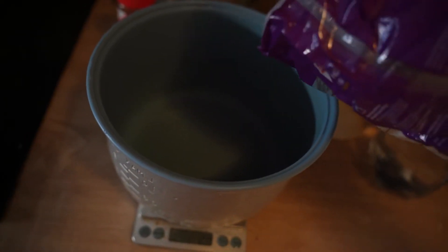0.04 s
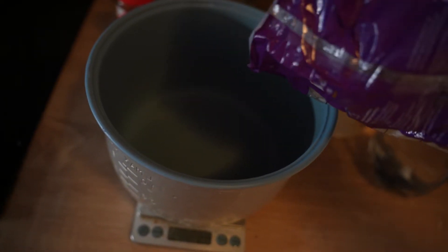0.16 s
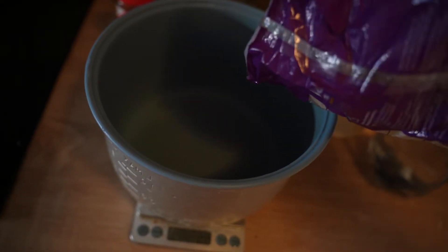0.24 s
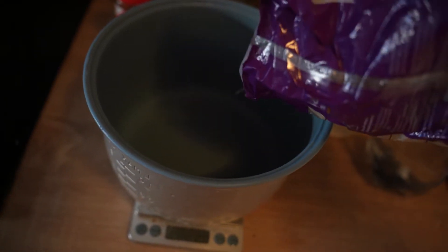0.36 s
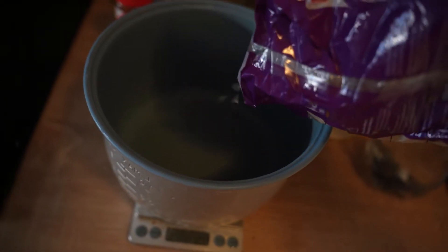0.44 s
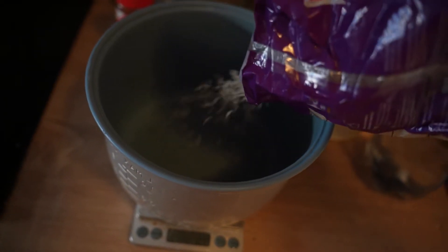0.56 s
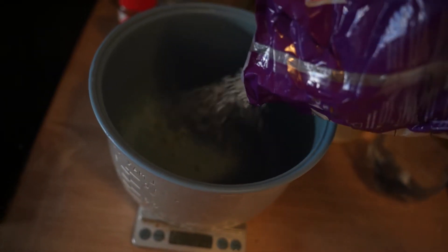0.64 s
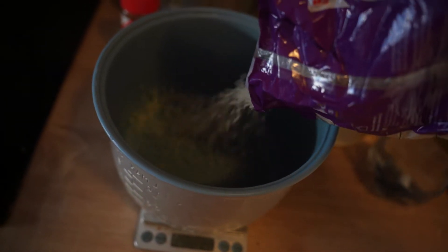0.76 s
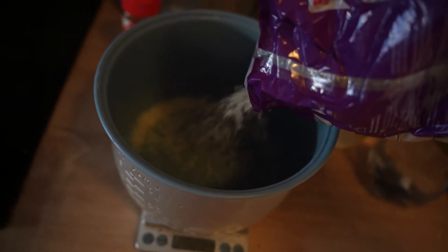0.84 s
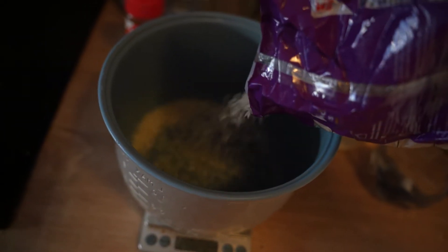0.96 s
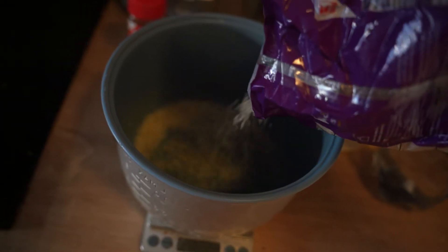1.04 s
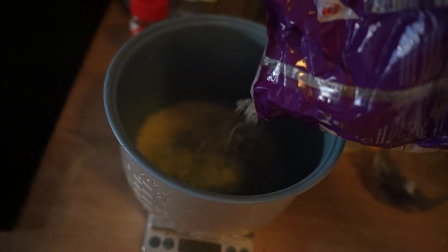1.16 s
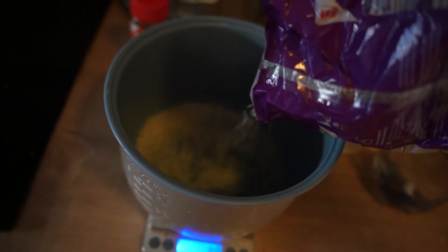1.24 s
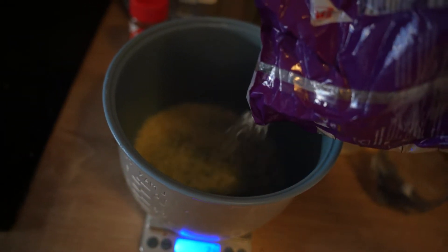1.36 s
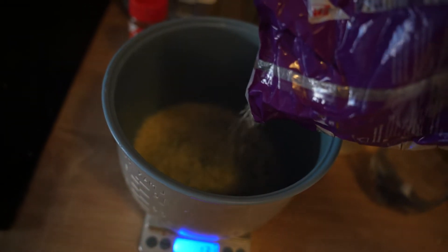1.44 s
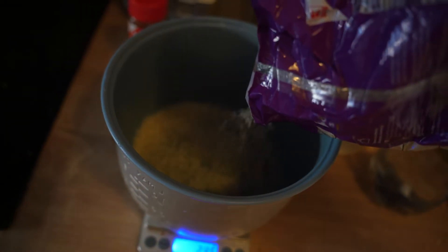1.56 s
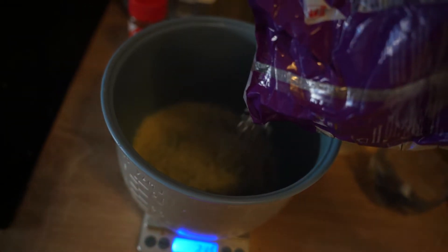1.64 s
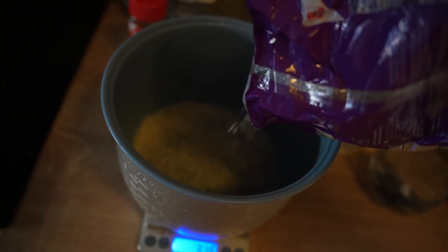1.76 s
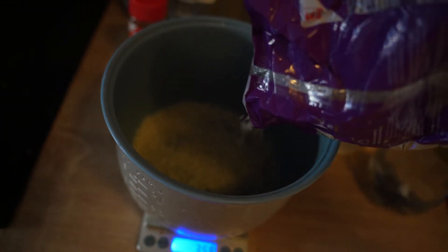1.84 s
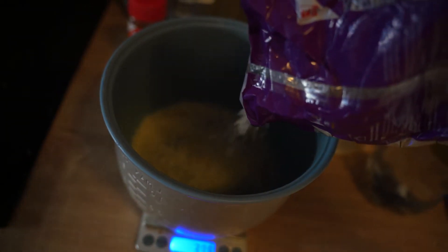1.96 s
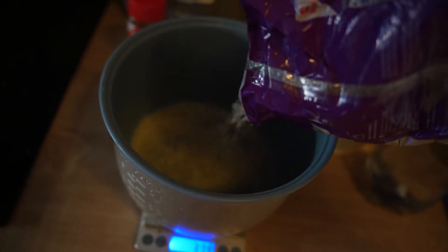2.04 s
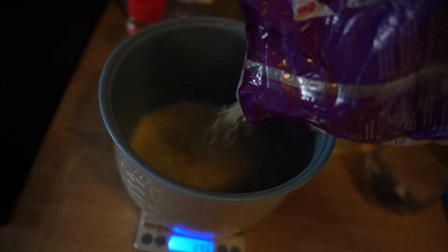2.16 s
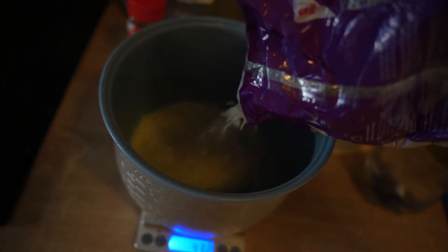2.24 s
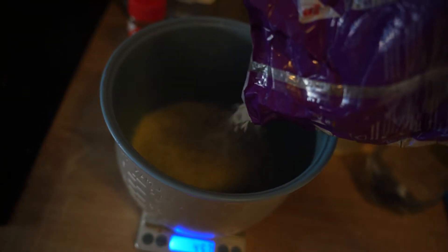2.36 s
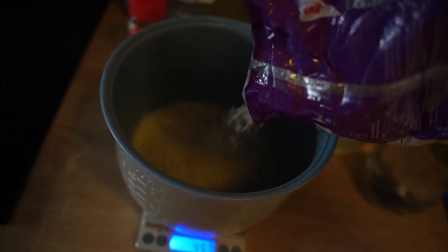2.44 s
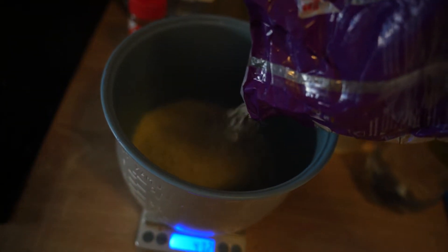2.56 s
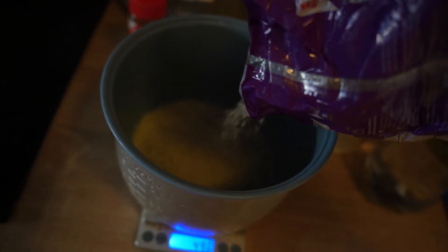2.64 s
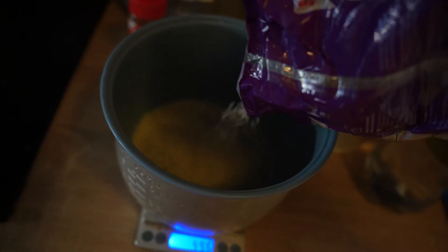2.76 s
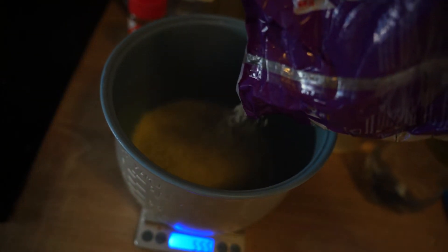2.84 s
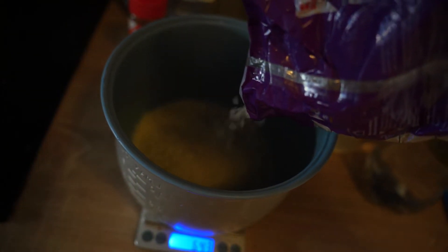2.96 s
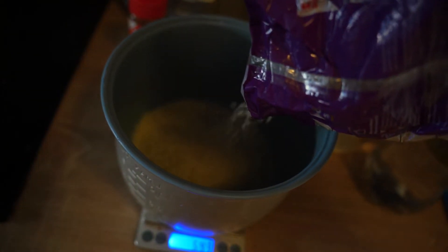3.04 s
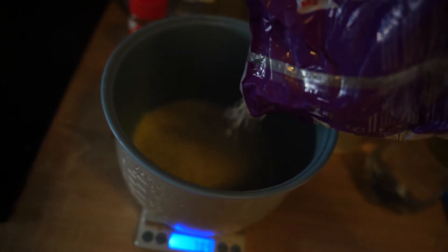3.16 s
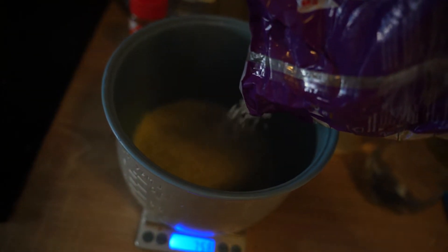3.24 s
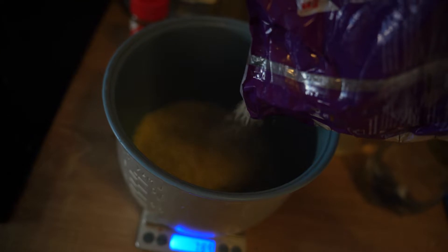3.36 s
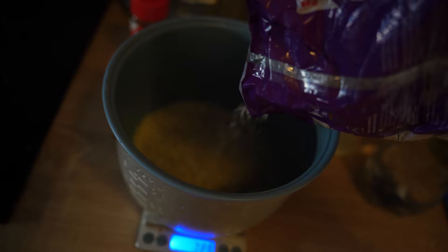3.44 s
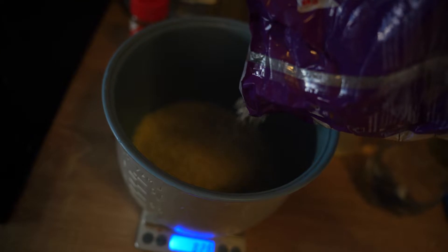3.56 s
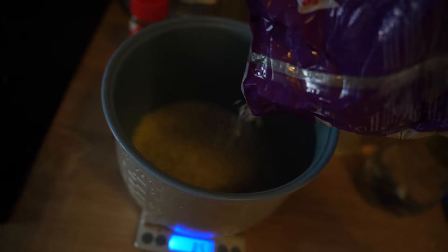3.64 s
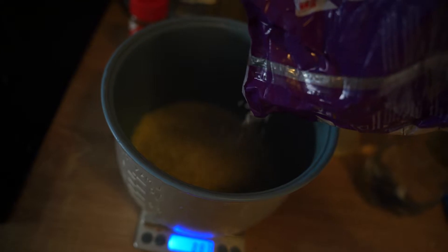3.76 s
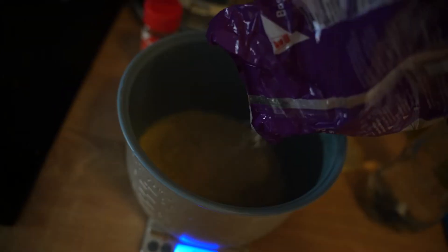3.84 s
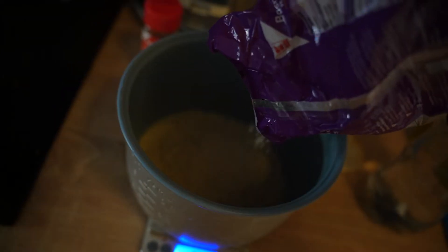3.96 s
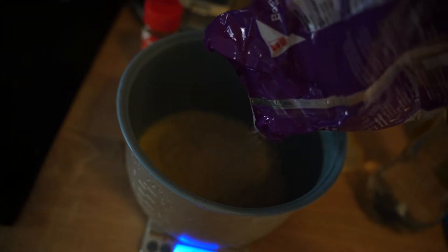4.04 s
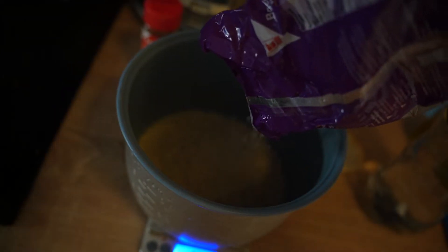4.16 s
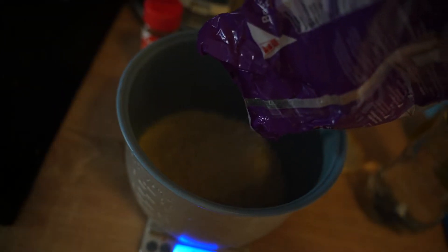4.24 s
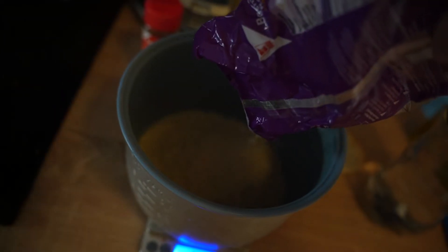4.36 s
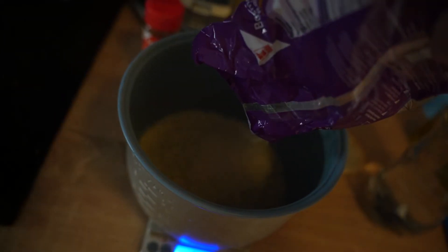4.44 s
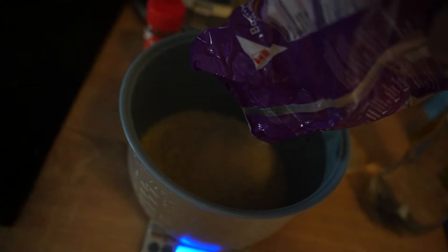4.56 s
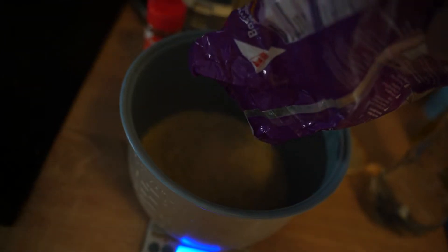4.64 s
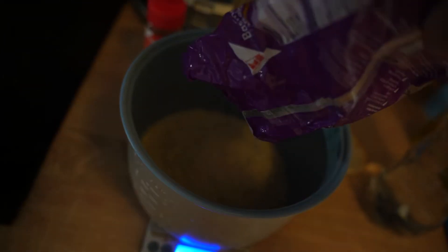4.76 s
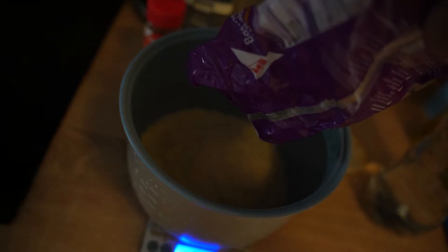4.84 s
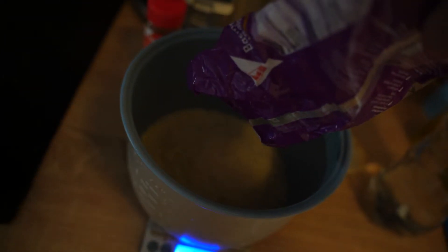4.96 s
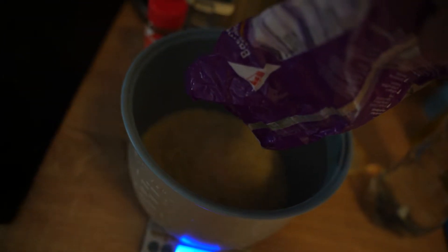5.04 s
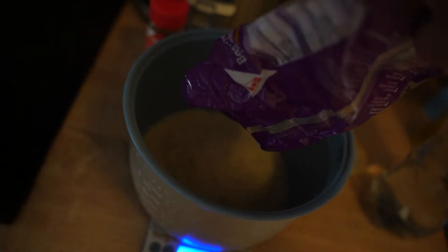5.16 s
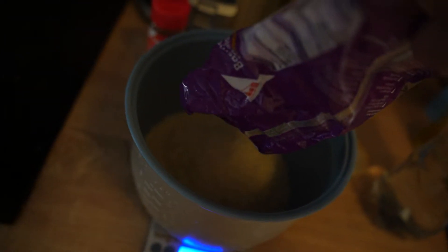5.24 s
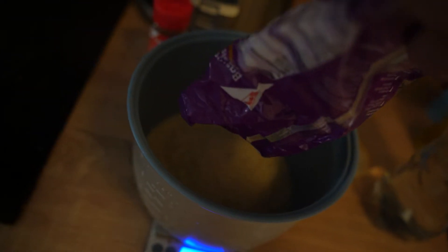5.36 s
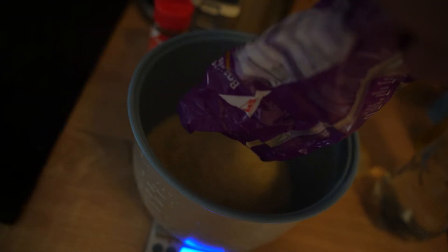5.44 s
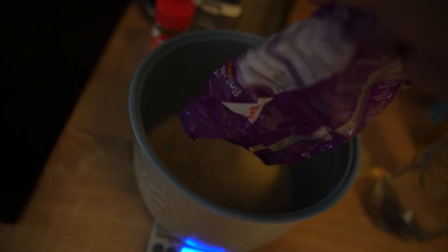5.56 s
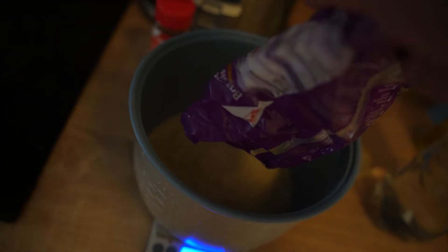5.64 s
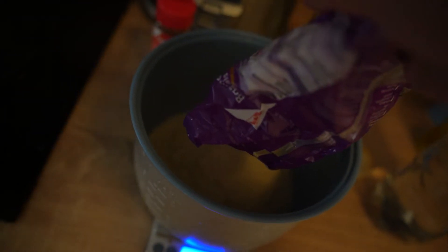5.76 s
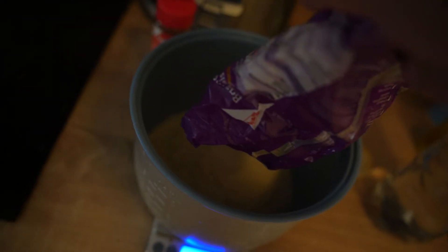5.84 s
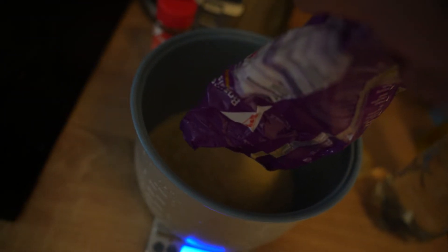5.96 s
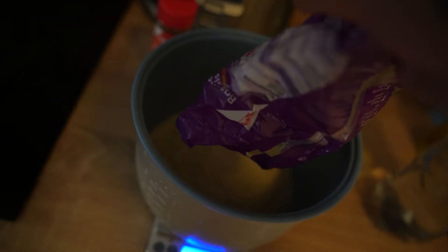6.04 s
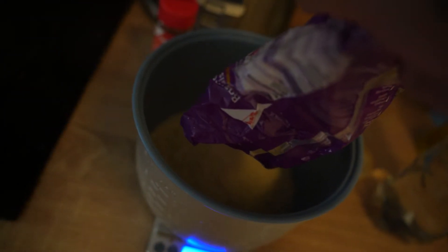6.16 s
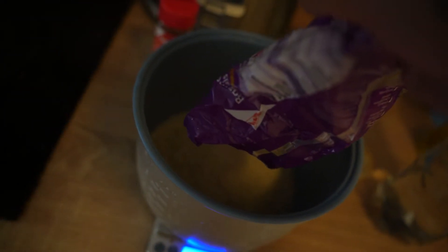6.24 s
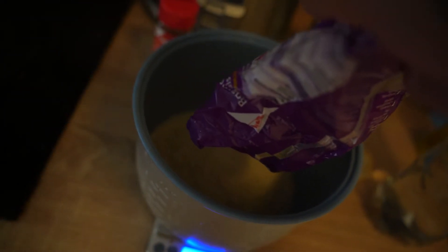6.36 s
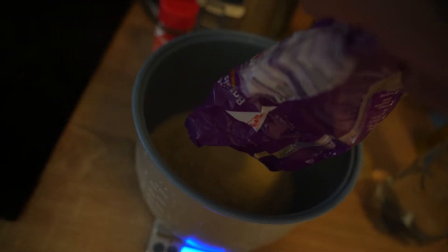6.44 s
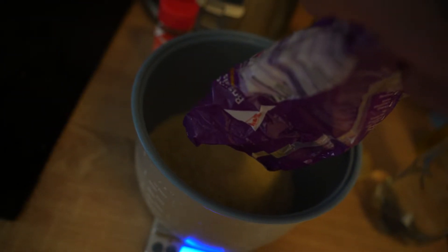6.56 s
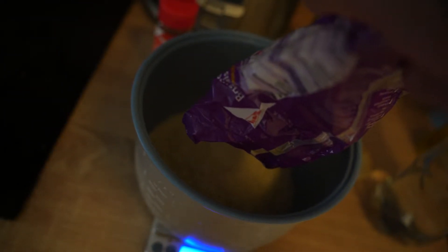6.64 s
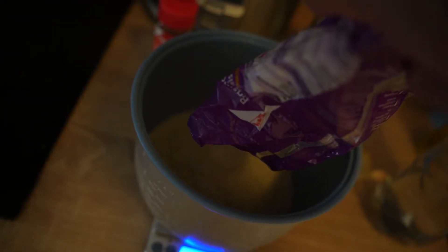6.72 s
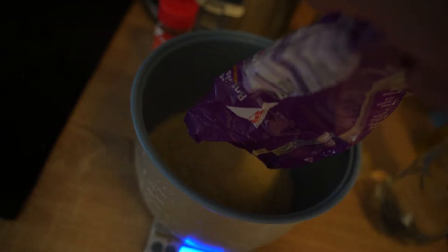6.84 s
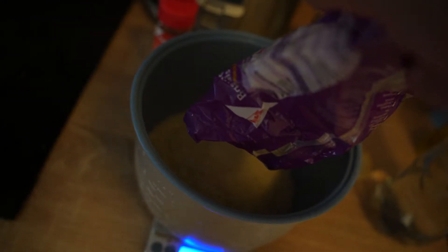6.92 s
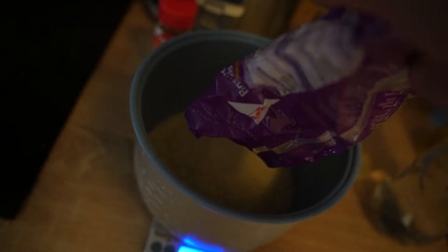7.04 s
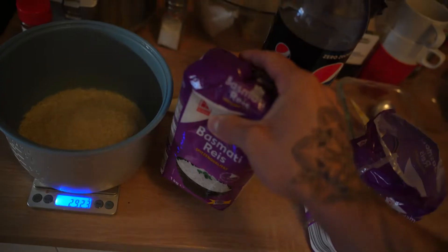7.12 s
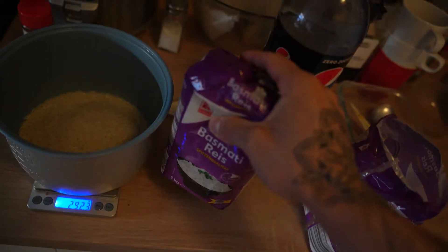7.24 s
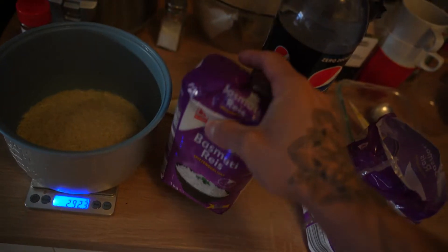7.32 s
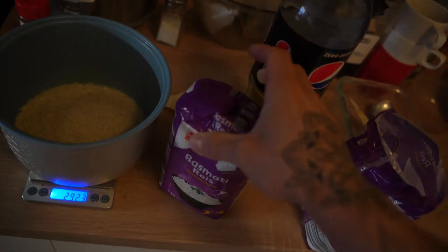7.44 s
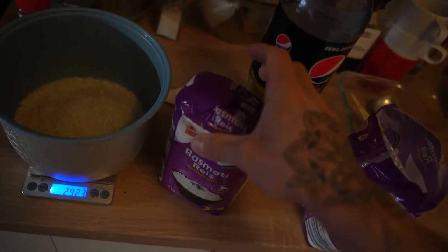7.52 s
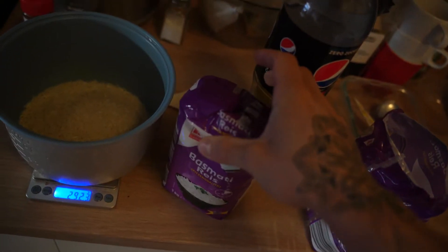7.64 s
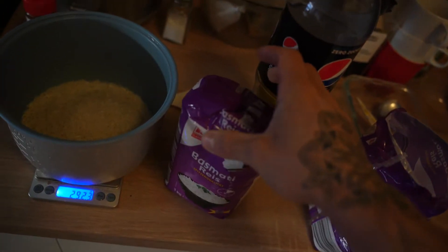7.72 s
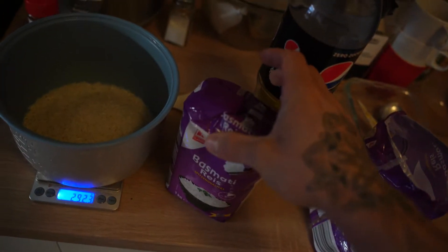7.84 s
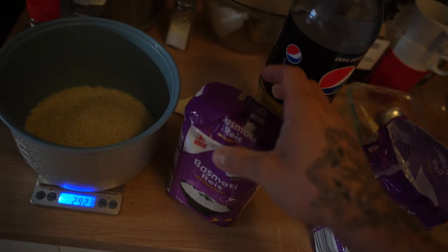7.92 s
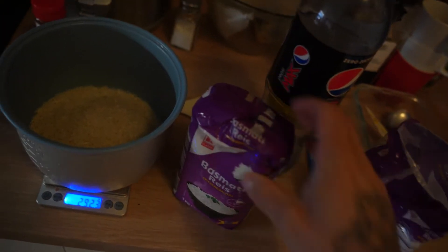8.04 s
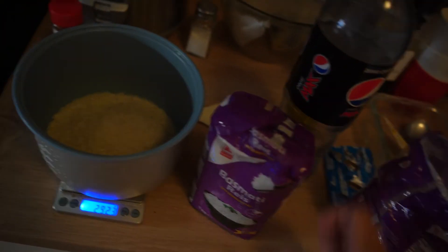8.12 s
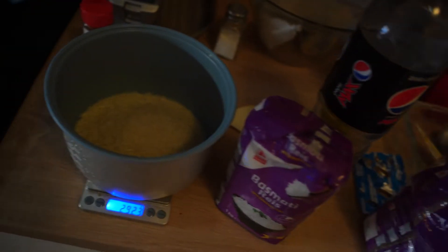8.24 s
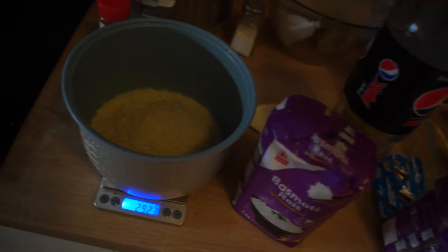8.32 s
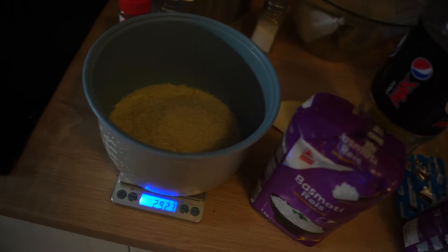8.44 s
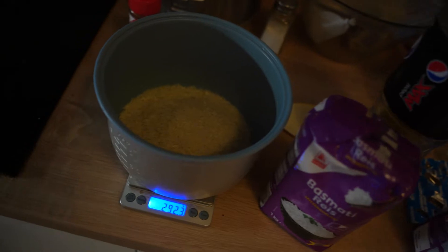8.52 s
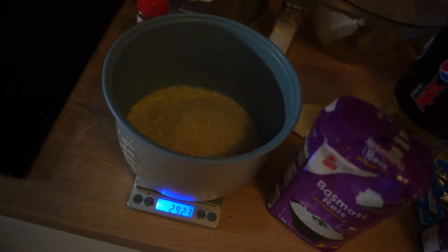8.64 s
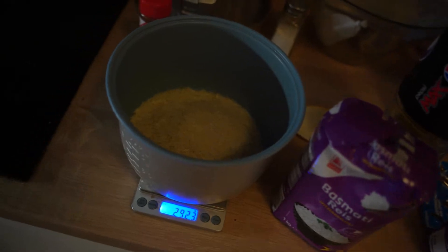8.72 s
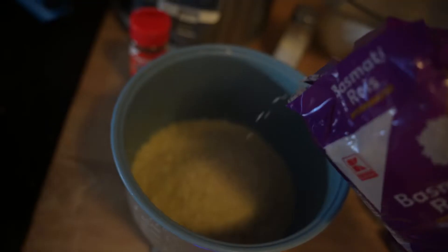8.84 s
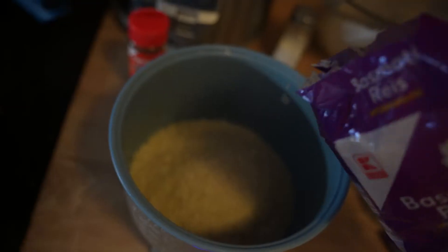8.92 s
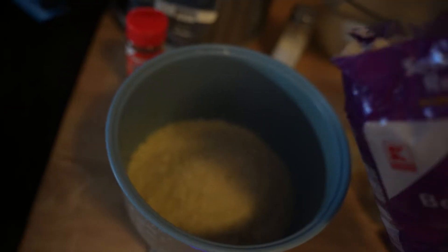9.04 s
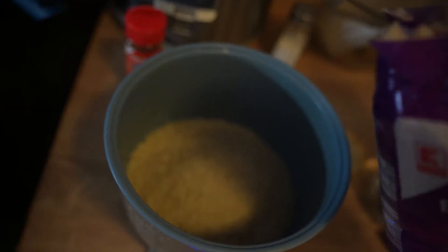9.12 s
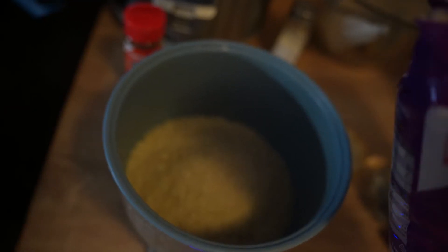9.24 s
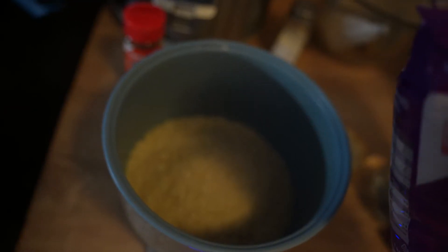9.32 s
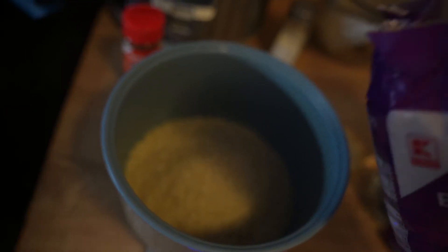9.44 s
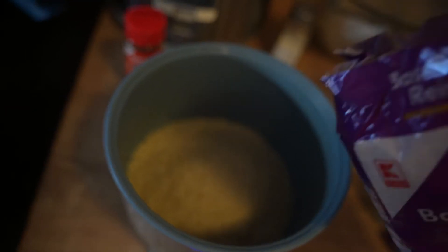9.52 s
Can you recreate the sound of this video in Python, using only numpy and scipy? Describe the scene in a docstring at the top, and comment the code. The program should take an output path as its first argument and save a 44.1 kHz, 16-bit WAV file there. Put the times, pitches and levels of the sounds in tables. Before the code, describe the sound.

Close in a quiet kitchen, a plastic bag crinkles sharply, then dry rice bursts into a metal pot with a bright, ringing hiss that quickly thins to a trickle. The bag is shaken empty with dense crackles and scattered grain ticks. After a lull, a full bag of rice drops on the counter with a crunchy, booming thud, and soft handling bumps follow.

```python
"""A plastic bag crinkles, then dry rice rushes from it into a metal pot in a quiet kitchen.
Grain clicks ring the pot by a share that changes during the pour; rubbing film, popping creases and stray
grains follow as the bag is emptied. A full bag drops on the counter, a crunch over booming modes, and is lifted.
One microphone, close perspective: the kitchen's diffuse echoes lie well under the direct sound,
over room air, a faint hum and a deep rumble made of noise and steady tones."""
import sys
import numpy as np
from scipy import signal
from scipy.fft import rfft, irfft
from scipy.io import wavfile

SR = 44100
rng = np.random.default_rng(int(sys.argv[2]) if len(sys.argv) > 2 else 0)


def master_out(mix):
    """Clip the mix to full scale and print it as 16-bit PCM to the path in sys.argv[1]."""
    frames = np.transpose(np.atleast_2d(mix))
    ceiling = np.clip(frames, -1, 1)
    pcm = np.round(ceiling * 32767).astype(np.int16)
    wavfile.write(sys.argv[1], SR, pcm)


N = 422919
TIME = np.arange(N) / SR  # s
# Levels in the tables are relative; each source sets its own place in the mix.

# the stream of rice opens, then thins to a trickle: [t/s, level/dB]
STREAM_FLOW = [(0.56, -34), (0.6, -19.5), (0.7, -14.5), (1.24, -18.5), (1.44, -25), (1.48, -22),
               (1.71, -23.5), (1.93, -33.5), (2.25, -30), (2.71, -45), (3.78, -51), (3.85, -46)]
# clumps of rice slip out together: [t/s, level/dB]
CLUMPS = [(1.335, -26), (1.513, -25), (1.786, -28), (1.891, -28.5)]
# how the pot answers: [t/s, ring against impacts/dB, bottom f/Hz, bottom against impacts/dB]
POT_ANSWER = [(0.5, -3.5, 674, -21), (1.0, -1.5, 665, -17.5), (1.4, -9, 590, -27), (1.799, -10, 560, -25),
              (2.1, -10, 540, -18), (2.8, -8, 566, -9.5), (3.7, -3, 568, -6.5), (4.0, -34, 580, -11)]
# colour of grains hissing on the heap: [f/Hz, level/dB]
RICE_COLOUR = [(250, -46), (440, -34.5), (620, -28), (1200, -3.5), (2500, -12), (3700, -7), (4500, -14),
               (7700, -9), (9000, 0.5), (10000, -1), (12400, -1), (13400, -8), (14600, -1.5),
               (16000, -24.5)]


def pour():
    """A stronger stream brings more impacts; they hiss on the heap and ring the pot."""
    ring_db, bottom_hz, bottom_db = in_time(POT_ANSWER)
    flow = level(STREAM_FLOW)
    flow = flow + sum(swell(s, db, rise_s=0.011, fall_s=0.015) for s, db in CLUMPS)
    unevenness = from_db(1.2 * drift(rate_hz=38))
    impacts = grains(800 + 90000 * flow, spread_db=3) * unevenness
    hiss = from_db(-2.0) * colour(impacts, RICE_COLOUR)
    wall = from_db(ring_db) * pot_wall(impacts)
    bottom = from_db(bottom_db) * pot_bottom(impacts, bottom_hz, width_hz=98)
    # below its lowest mode the pot hardly radiates
    radiates = signal.butter(6, 470, "high", fs=SR, output="sos")
    return signal.sosfilt(radiates, flow * (hiss + wall + bottom))


# modes of the pot wall: [f/Hz, width/Hz, level/dB]
POT_WALL = [(1130, 200, -11), (1762, 20, -1), (2245, 60, -4), (2910, 100, -7), (3151, 36, -3),
            (4010, 46, 1), (4720, 70, -9), (5000, 24, 4), (5460, 90, -8), (5867, 35, -1), (6170, 60, -7),
            (7050, 50, -12), (7450, 120, -10), (8370, 120, -10), (8742, 40, -3), (8907, 45, -1),
            (9327, 55, -1), (9810, 40, -7), (10447, 35, -3), (10700, 90, -3), (11200, 90, -6),
            (11670, 100, -4), (12370, 100, -3)]


def pot_wall(clicks):
    """The wall's modes, of alternating sign, ring together at unit power gain."""
    tap = signal.unit_impulse(SR // 6)
    ring = 0
    for k, (hz, width_hz, db) in enumerate(POT_WALL):
        mode = signal.lfilter(*resonator(hz, width_hz), tap)
        ring = ring + (-1) ** k * from_db(db) * mode
    return signal.oaconvolve(clicks, unit_energy(ring))[:N]


def pot_bottom(clicks, pitch_hz, width_hz, size=256):
    """The bottom's mode shifts in pitch during the pour; two equal resonances make it steep on both sides."""
    out, state = np.zeros(N), np.zeros((2, 2))
    for i in range(0, N, size):
        section = np.concatenate(resonator(pitch_hz[i], width_hz))
        out[i:i + size], state = signal.sosfilt([section, section], clicks[i:i + size], zi=state)
    return rms_one(out)


def dribble(count=48):
    """Rows (t/s, level/dB) of fainter grains that fall at random while the bag empties."""
    start_s, end_s = 4.1, 6.15
    middle_db, reach_db = -33.5, 6.5  # levels lie evenly within the reach on either side
    chance = rng.random((count, 2))
    return [(start_s + when * (end_s - start_s), middle_db + reach_db * (2 * size - 1))
            for when, size in chance]


# the loudest single grains drop into the pot: [t/s, level/dB]
LOUD_GRAINS = [(0.5234, -17), (0.5451, -6), (0.609, -5.5), (3.0127, -24), (3.877, -28), (3.957, -28.5),
               (4.1132, -24.5), (4.248, -27), (4.45, -23), (4.54, -26.5), (4.62, -27), (4.696, -18.5),
               (4.92, -20.5), (5.2242, -13.5), (5.279, -20), (5.3688, -18), (5.389, -20), (5.473, -16.5),
               (5.5967, -19.5), (5.7086, -18.5), (5.7704, -21.5), (5.91, -20.5), (6.0936, -20),
               (6.127, -18.5), (6.203, -29.5), (6.238, -23), (6.69, -33), (8.844, -28), (8.8746, -36.5)]
# colour of one grain's tick: [f/Hz, level/dB]
TICK_COLOUR = [(400, -26.5), (1200, -6.5), (4000, -20), (7000, -7), (9300, 4.5), (12000, 3), (13500, 3),
               (15000, -4.5), (16000, -0.5)]
# grains glance off the pot's upper side: [t/s, level/dB]
GLANCES = [(5.370, -40), (5.390, -40), (5.710, -40.5)]
# modes of that upper side: [f/Hz, level/dB, t60/s]
UPPER_SIDE = [(4390, 2, 0.15), (5730, -4, .18), (6130, -13.5, .2), (6650, 7, 0.1), (7220, 1.5, 0.16),
              (8040, -3.5, .15), (8630, 2, 0.25)]


def stray_grains():
    """Grains tick and bounce; the pot answers by a share that changes; glancing grains ping its upper side."""
    clicks, pings = np.zeros(N), np.zeros(N)
    for s, db in LOUD_GRAINS + dribble():
        bounce = rattle(contact_s=.0016, after=2.2, decay_s=.009, per_s=2400)
        add(clicks, s, from_db(db + 13.0) * bounce)
    for s, db in GLANCES:
        # every spot on the side favours other modes
        modes = [(hz, mode_db + rng.normal(0, 2.6), t60) for hz, mode_db, t60 in UPPER_SIDE]
        add(pings, s, from_db(db - 4.0) * struck(modes))
    ring_db = in_time(POT_ANSWER)[0]
    return colour(clicks, TICK_COLOUR) + from_db(ring_db) * pot_wall(clicks) + pings


# rice slides over the film as the bag tips and empties: [t/s, level/dB]
SLIDING_RICE = [(0, -37), (0.2, -36), (0.35, -32), (0.45, -31), (0.7, -36), (1.9, -40.5), (2.12, -38),
                (2.65, -40.5), (3.7, -45), (4.25, -42.5), (4.85, -49.5), (5.2, -40), (5.42, -49),
                (5.85, -48.5), (6.06, -42), (6.25, -78)]
# rice shifts in the full bag as it is lowered: [t/s, level/dB]
LOWERED_BAG = [(7.28, -75), (7.335, -59.5), (7.42, -47.5)]
# and as it is lifted: [t/s, level/dB]
LIFTED_BAG = [(8.835, -64.5), (9.15, -65), (9.59, -70.5)]
# a jolt of the bag throws the rice against the film: [t/s, level/dB, settling time/s]
BAG_JOLTS = [(0.49, -35, 0.015), (4.719, -41.5, 0.0043), (5.045, -34, 0.0056), (5.114, -36, 0.015),
             (5.234, -37, 0.018), (5.513, -32.5, .035), (5.593, -28.5, 0.019), (5.98, -29.5, 0.0094),
             (6.495, -38.5, 0.01), (7.044, -59.5, 0.018), (7.362, -36.5, 0.052), (8.394, -64, .04),
             (9.172, -52, 0.12), (9.39, -64, 0.013), (9.585, -56, .03)]
# how strongly the film pops, changing as the bag is handled: [t/s, pops against rubbing rice/dB]
POP_SHARE = [(0, -7.5), (2.2, -7), (4.2, -4.5), (5.2, -1), (6.1, -6), (7.3, -9), (8.9, -0.5), (9.2, -4.5)]
# colour of rice rubbing on film: [f/Hz, level/dB]
FILM_COLOUR = [(100, -27.5), (350, -15.5), (700, -4.5), (1400, -2), (1650, -4.5), (1900, 3), (2400, -2.5),
               (3200, -1.5), (4600, -6), (6000, -8), (8000, -12.5), (12000, -13.5), (16000, -30)]


def rustle(count=10):
    """Rice rubs along the film, and small creases pop, each panel at its own pitch."""
    motion = level(SLIDING_RICE) + level(LOWERED_BAG) + level(LIFTED_BAG)
    motion = motion + sum(swell(s, db, .0035, settle_s) for s, db, settle_s in BAG_JOLTS)
    rubbing = grains(3800, spread_db=4.0) * from_db(1.67 * drift(rate_hz=34))
    rub = colour(rubbing, FILM_COLOUR)
    pops = 0
    for hz in np.geomspace(1200, 3800, count):
        panel = resonator(hz, width_hz=0.5 * hz)
        pops = pops + twice(panel, grains(18, spread_db=6.5)) / np.sqrt(hz)
    pop_db, = in_time(POP_SHARE)
    return motion * (rub + from_db(pop_db) * rms_one(pops))


# the loudest creases of the bag, and a click at 7.11 s, probably the camera being handled:
# [t/s, level/dB, panel f/Hz, treble against the panel/dB]
SHARP_SNAPS = [(0.109, -16, 790, -9), (0.145, -24, 2080, 8), (0.282, -13.5, 1870, 4.5),
               (0.331, -12.5, 1550, 3), (0.353, -13.5, 2280, 1), (0.473, -7, 875, -1.5),
               (2.896, -22, 1950, -8), (4.007, -25.5, 3550, -3), (4.268, -30.5, 1390, 3),
               (4.352, -19, 1360, -3), (4.402, -29.5, 1280, 11), (4.441, -29, 1860, 12),
               (4.479, -17, 1880, 0), (4.61, -25, 2040, 5.5), (4.684, -21, 960, -2),
               (4.719, -20.5, 1050, 9), (4.787, -26, 3670, 4.5), (4.946, -16, 1790, -4.5),
               (4.988, -29.5, 2030, 4), (5.002, -18, 1830, 2), (5.049, -16, 1690, -1.5),
               (5.111, -14.5, 1830, -6), (5.134, -14, 1410, -12), (5.151, -17, 1840, -7),
               (5.183, -14.5, 1780, -1.5), (5.223, -21.5, 1840, 6.5), (5.232, -18, 1850, 5),
               (5.29, -27, 1900, 10.5), (5.31, -22, 1910, 8), (5.345, -17.5, 1930, 2),
               (5.394, -12, 1070, -15), (5.452, -26.5, 2030, 4), (5.501, -25, 2000, 11),
               (5.522, -17.5, 1320, 5), (5.566, -12, 1420, -3), (5.593, -13.5, 3000, -8),
               (5.61, -27, 2990, 10), (5.641, -16.5, 1770, -4), (5.674, -22.5, 3100, -0.5),
               (5.702, -21.5, 2300, 7.5), (5.746, -16, 1630, 1.5), (5.876, -20, 1690, 2.5),
               (5.9, -8.5, 1230, -6), (5.948, -18, 1480, 0), (5.969, -10, 2040, -2.5),
               (6.019, -26, 1950, 9), (6.043, -25.5, 2740, 8.5), (6.091, -18.5, 3650, -12),
               (6.306, -22, 1160, 0.5), (6.395, -29.5, 1150, 9), (6.409, -21, 1130, -6.5),
               (6.491, -24, 1400, -5), (7.043, -27.5, 900, -16.5), (7.111, -39, 613, -3.5),
               (7.344, -31.5, 1750, 10.5), (7.359, -14, 1270, -6), (7.425, -33.5, 3000, 2),
               (7.659, -34.5, 1390, 11.5), (8.391, -43, 1785, 4.5), (8.835, -34.5, 986, -17),
               (8.88, -36, 810, -14), (8.99, -35, 710, -6), (9.09, -38, 705, -4), (9.168, -32, 3460, 5),
               (9.287, -34, 1610, -1)]
# colour of a crease's crack: [f/Hz, level/dB]
CRACK_COLOUR = [(120, -23), (400, -10.5), (800, -0.5), (1900, -3), (3500, -2.5), (5500, -8.5),
                (8000, -12.5), (12000, -15.5), (16000, -24.5)]


def snaps():
    """A crease buckles: a ragged crack, and the panel beside it rings for a few cycles."""
    cracks, panels = np.zeros(N), np.zeros(N)
    for s, db, hz, treble_db in SHARP_SNAPS:
        buckle = rattle(contact_s=.001, after=.85, decay_s=.007, per_s=1800)
        crack = unit_energy(colour(buckle, CRACK_COLOUR))
        panel = unit_energy(twice(resonator(hz, width_hz=0.69 * hz), buckle))
        add(cracks, s, from_db(db + treble_db + 7.5) * crack)
        add(panels, s, from_db(db + 7.0) * panel)
    return cracks + panels


# dull bumps of the handled bag, and one at 7.11 s, probably the camera being handled:
# [t/s, level/dB, f/Hz]
DULL_BUMPS = [(0.111, -31, 599), (0.178, -32, 268.3), (0.333, -25, 335.6), (0.374, -28.5, 498),
              (0.473, -31.5, 333.2), (3.829, -39, 80), (4.719, -32.5, 500), (7.042, -34.5, 400),
              (7.112, -32.5, 70.7), (7.217, -42.5, 110), (7.361, -22.5, 316), (8.988, -37, 280),
              (9.169, -28.5, 311), (9.356, -37.5, 262)]


def bumps():
    """Soft, heavily damped knocks: brief noise in a wide band around each pitch."""
    out, t = np.zeros(N), TIME[:SR // 8]
    for s, db, hz in DULL_BUMPS:
        push = rng.standard_normal(len(t)) * np.exp(-t / 0.012)
        body = signal.butter(3, [0.45 * hz, 1.7 * hz], "band", fs=SR, output="sos")
        add(out, s, from_db(db + 14.5) * unit_energy(signal.sosfilt(body, push)))
    return out


# contacts of the full bag as it lands: [t/s, level/dB]
CONTACTS = [(7.434, -1.5), (7.439, 3), (7.444, -6), (7.452, -14)]
# colour of the crunching rice: [f/Hz, level/dB]
CRUNCH_COLOUR = [(88, -33.5), (150, -18.5), (197, -1), (248, -37.5), (290, -5), (540, -9.5), (722, -7.5),
                 (985, -13), (1090, -12.5), (2270, -16), (3100, -17), (8830, -22.5), (15500, -31)]
# modes of the counter top: [f/Hz, level/dB, t60/s]
COUNTER_TOP = [(49.7, -26, 2.7), (76, -1.5, 0.15), (107.5, 3, .22), (131, -28, 1.4), (154.8, -4, 0.242),
               (188.7, -5.5, 0.2), (261, -12, 0.24), (290, -9.5, 0.44), (319, -8, .3), (393, -12.5, .16),
               (462, -16, 0.44), (551, -15.5, 0.16)]
# modes of the dishes standing on it: [f/Hz, level/dB, t60/s]
STANDING_DISHES = [(1660, -3, .9), (2202, -10, .7), (2320, -7, .5), (3203, -2, .7), (4662, -4, .45),
                   (7537, -3, .7), (9572, 4, .55)]


def landing():
    """The full bag slumps onto the counter: the top booms, the rice crunches and settles, dishes ring faintly."""
    crunch, boom, t = np.zeros(N), np.zeros(N), TIME[:SR]
    for s, db in CONTACTS:
        settling = np.exp(-t / 0.0058) + 0.58 * np.exp(-t / 0.045)
        add(crunch, s, from_db(db - 17.5) * settling * grains(9000, spread_db=0.5, size=len(t)))
    heaviest_s = CONTACTS[1][0]
    add(boom, heaviest_s, from_db(-17) * struck(COUNTER_TOP))
    add(boom, heaviest_s, from_db(-51) * struck(STANDING_DISHES))
    # the counter radiates little below this pitch
    radiates = signal.butter(2, 54.6, "high", fs=SR, output="sos")
    return colour(crunch, CRUNCH_COLOUR) + signal.sosfilt(radiates, boom)


# echoes of the room by band: [low edge f/Hz, high edge f/Hz, t60/s, level/dB]
ROOM_BANDS = [(30, 360, 0.85, -2), (453.6, 2800, 0.36, 1.5), (3940, 11000, 0.42, 1.5)]


def kitchen(x):
    """Diffuse reflections that start after a few milliseconds; the bass lingers."""
    t = TIME[:SR]
    noise = rng.standard_normal(len(t)) * (t > .004)
    tail = 0
    for low_hz, high_hz, t60, db in ROOM_BANDS:
        band = signal.butter(2, [low_hz, high_hz], "band", fs=SR, output="sos")
        tail = tail + signal.sosfilt(band, noise) * from_db(db - 60 * t / t60)
    return signal.oaconvolve(x, unit_energy(tail))[:N]


# colour of the still room air: [f/Hz, level/dB]
AIR_COLOUR = [(26, -15.5), (45, -14.5), (108, -13.5), (126, -27), (145, -17), (186, -25.5), (237, -15),
              (275, -20), (459, -21.5), (558, -29.5), (600, -23), (767, -32.5), (15500, -51.5)]
# a faint steady hum in the room: [f/Hz, level/dB]
HUM_TONES = [(102, -74.5), (156, -84), (231.5, -77), (344.5, -83.5), (463, -78), (592, -79.5)]


def background():
    """Still room air and a faint hum over a deep, wavering rumble of narrow-band noise."""
    band = signal.butter(2, [16, 21], "band", fs=SR, output="sos")
    # the first second is dropped while the filter settles
    rumble = from_db(-50) * rms_one(signal.sosfilt(band, rng.standard_normal(N + SR))[SR:])
    hum = 0
    for hz, db in HUM_TONES:
        tone = np.sqrt(2) * np.sin(2 * np.pi * (hz * TIME + rng.random()))
        hum = hum + from_db(db) * tone
    air = from_db(-65) * colour(rng.standard_normal(N), AIR_COLOUR)
    return air + hum + rumble


def rattle(contact_s, after, decay_s, per_s):
    """A brief rough contact trailed by clicks that die away; energy 1."""
    t = TIME[:SR // 8]
    contact = unit_energy(rng.choice([-1, 1], len(t)) * np.exp(-t / contact_s))
    bounces = grains(per_s, spread_db=4, size=len(t))
    return unit_energy(contact + after * unit_energy(bounces * np.exp(-t / decay_s)))


def grains(per_s, spread_db, size=N):
    """Random clicks of uneven size, with mean power near 1."""
    chance = np.clip(per_s / SR, 1e-5, 1)
    sizes = rms_one(from_db(spread_db * np.clip(rng.standard_normal(size), -2, 2)))
    sizes = sizes * rng.choice([-1, 1], size)
    return sizes * (rng.random(size) < chance) / np.sqrt(chance)


def drift(rate_hz, size=4000):
    """Slow random wavering of spread 1."""
    r = np.exp(-2 * np.pi * rate_hz * N / SR / size)
    slow = signal.lfilter([1], [1, -2 * r, r * r], rng.standard_normal(2 * size))[size:]
    return np.interp(np.linspace(0, size - 1, N), np.arange(size), rms_one(slow))


def struck(modes):
    """One second of freely decaying modes."""
    t = TIME[:SR]
    return sum(from_db(db - 60 * t / t60) * np.sin(2 * np.pi * hz * t) for hz, db, t60 in modes)


def resonator(hz, width_hz):
    """Coefficients of a resonance with gain 1 on top."""
    r = np.exp(-np.pi * width_hz / SR)
    return np.array([1, 0, -1]) * (1 - r * r) / 2, [1, -2 * r * np.cos(2 * np.pi * hz / SR), r * r]


def twice(resonance, x):
    """A resonance applied twice has steep skirts."""
    return signal.lfilter(*resonance, signal.lfilter(*resonance, x))


def colour(x, spectrum, size=4096):
    """Causal (minimum-phase) filter of unit power gain that follows a spectrum."""
    hz, db = np.transpose(spectrum)
    log_hz = np.log(np.fft.rfftfreq(size, 1 / SR) + 1)
    gain = from_db(np.interp(log_hz, np.log(hz), db))
    # folding the cepstrum onto positive times makes the filter minimum-phase
    cepstrum = irfft(np.log(gain))[:size // 2]
    cepstrum[1:] *= 2
    response = unit_energy(irfft(np.exp(rfft(cepstrum, size))))
    return signal.oaconvolve(x, response)[:len(x)]


def level(rows):
    """Gain along a (t/s, level/dB) curve, fading within milliseconds outside it."""
    s, db = np.transpose(rows)
    outside = np.abs(TIME - np.clip(TIME, s[0], s[-1]))
    return from_db(np.interp(TIME, s, db)) * np.exp(-np.minimum(outside / 0.014, 30))


def swell(s, db, rise_s, fall_s):
    """Gain that rises to a peak at a time and dies away."""
    distance = np.maximum((s - TIME) / rise_s, (TIME - s) / fall_s)
    return from_db(db) * np.exp(-np.minimum(distance, 30))


def in_time(rows):
    """The columns of a curve at every sample."""
    s, *columns = np.transpose(rows)
    return [np.interp(TIME, s, c) for c in columns]


def add(track, s, sound):
    """Mix a sound into a track at a time."""
    start = max(round(s * SR), 0)
    track[start:start + len(sound)] += sound[:max(N - start, 0)]


def from_db(db):
    """Amplitude gain of a level in dB."""
    return 10 ** (np.asarray(db) / 20)


def rms_one(x):
    """Scale to a mean power of 1."""
    return x / np.sqrt(np.mean(x ** 2) + 1e-20)


def unit_energy(x):
    """Scale to a total energy of 1."""
    return x / np.sqrt(np.sum(x ** 2) + 1e-20)


def scene():
    """Bag, pot and counter, each with its own share of the room."""
    bag = rustle() + snaps() + bumps()
    rice = pour() + stray_grains()
    thud = landing()
    to_room = from_db(-14) * bag + from_db(-13.5) * rice + from_db(-26.5) * thud
    return (bag + rice + thud + kitchen(to_room) + background())[None]


def record(dry):
    """At the microphone the highest peaks are rounded and the top is cut."""
    rounded = 1.745 * np.tanh(dry / 1.408)
    top_cut = signal.ellip(12, .1, 80, 15900, fs=SR, output="sos")  # ripple/dB, stopband/dB, edge/Hz
    return signal.sosfilt(top_cut, rounded)


dry = scene()
out = record(dry)
master_out(out)
```